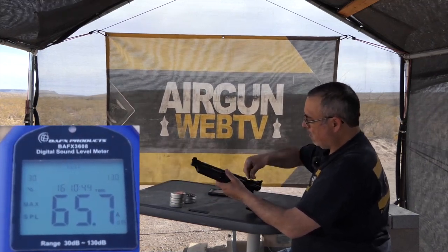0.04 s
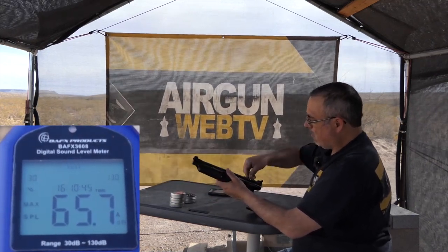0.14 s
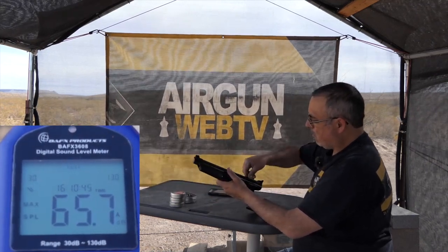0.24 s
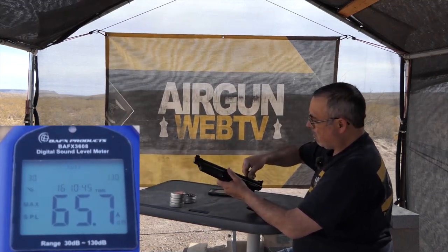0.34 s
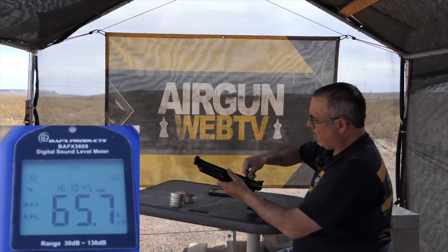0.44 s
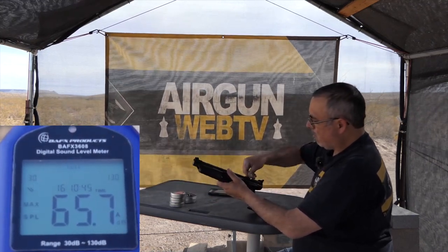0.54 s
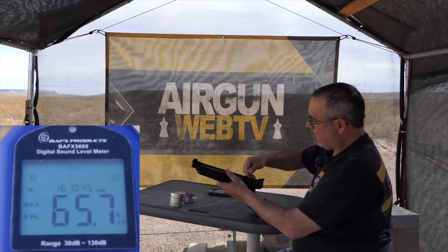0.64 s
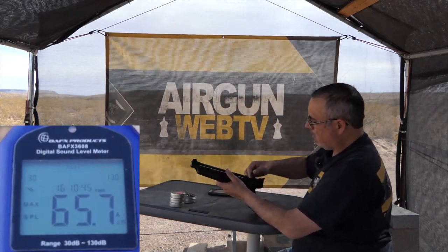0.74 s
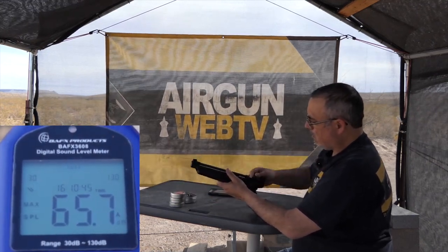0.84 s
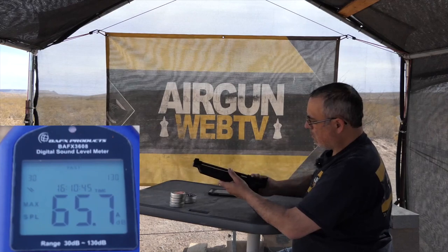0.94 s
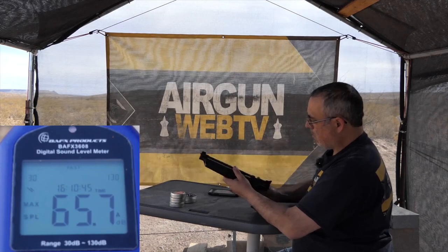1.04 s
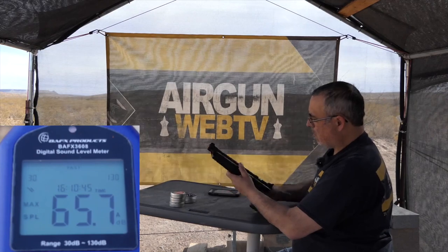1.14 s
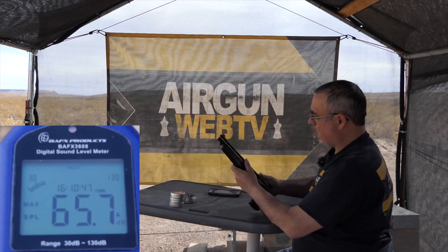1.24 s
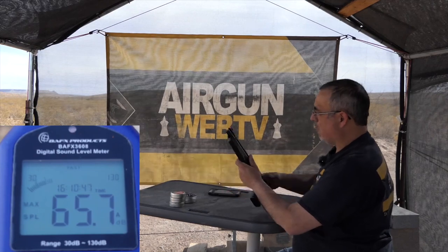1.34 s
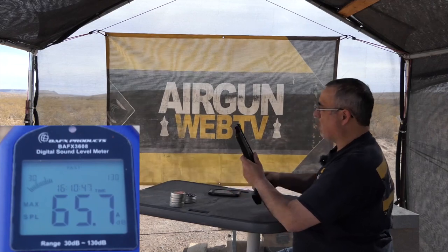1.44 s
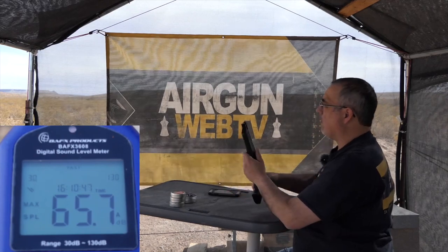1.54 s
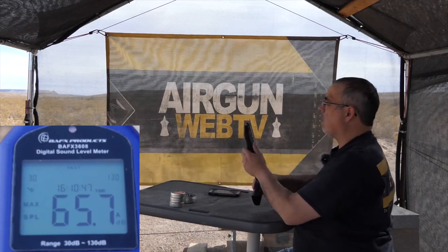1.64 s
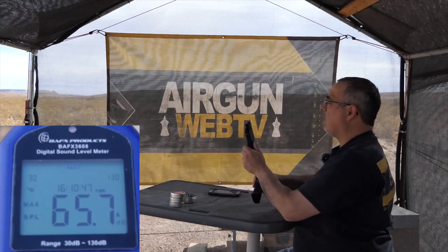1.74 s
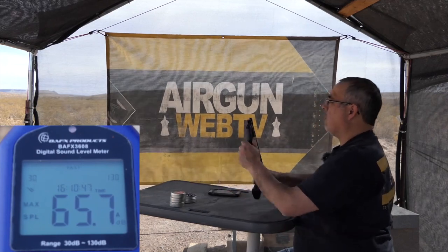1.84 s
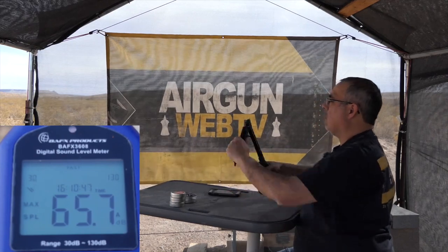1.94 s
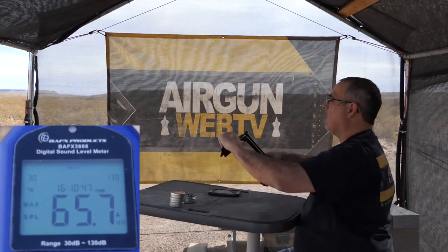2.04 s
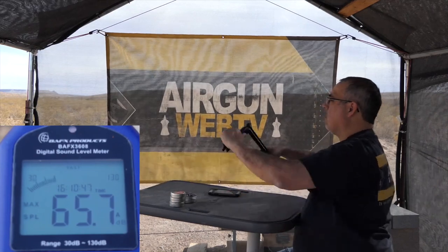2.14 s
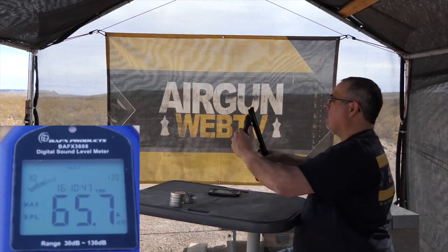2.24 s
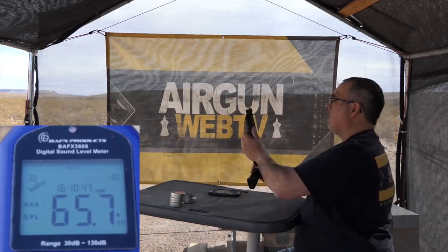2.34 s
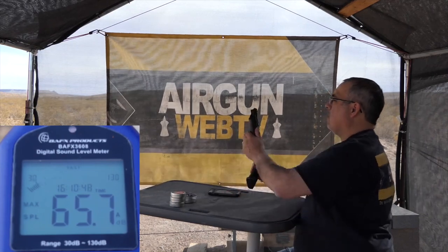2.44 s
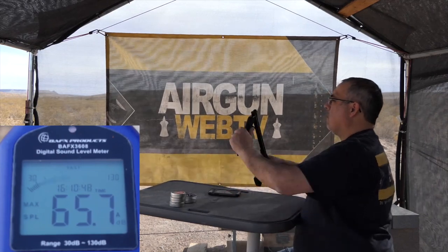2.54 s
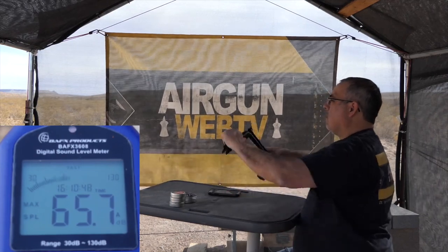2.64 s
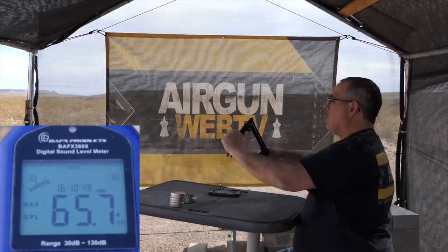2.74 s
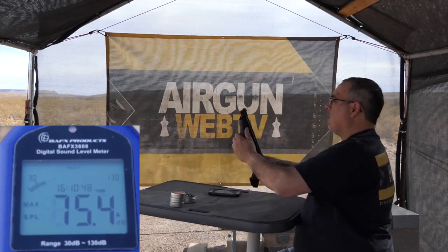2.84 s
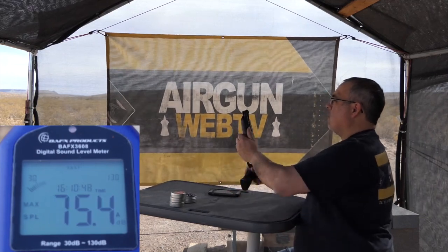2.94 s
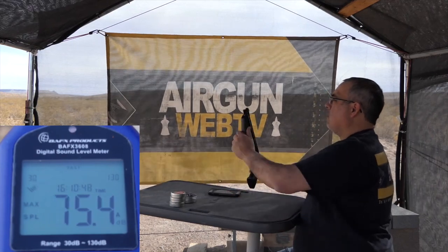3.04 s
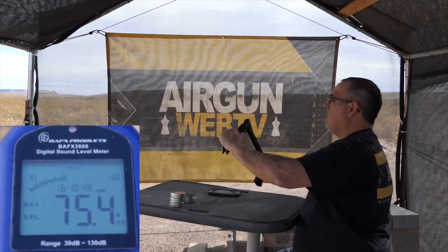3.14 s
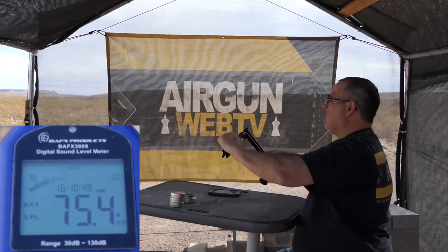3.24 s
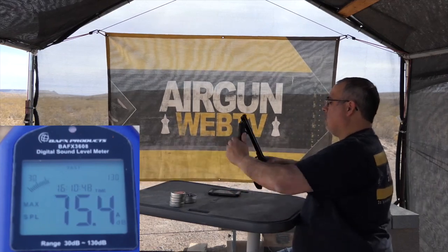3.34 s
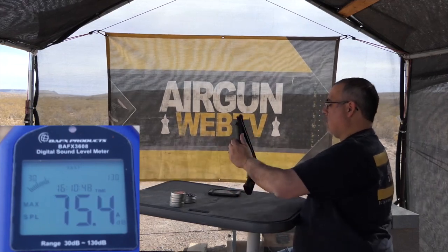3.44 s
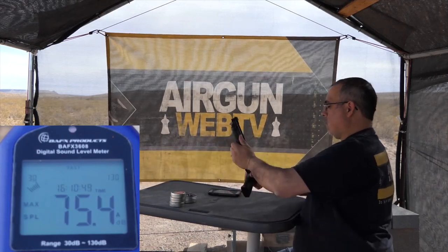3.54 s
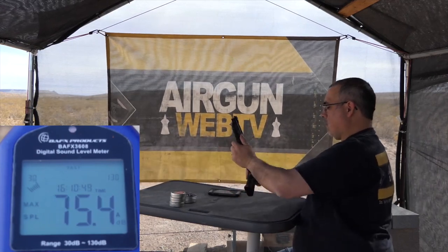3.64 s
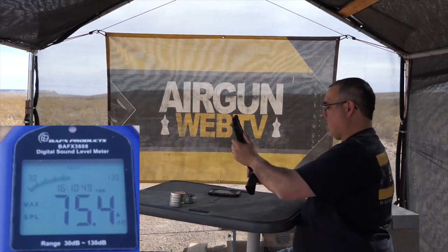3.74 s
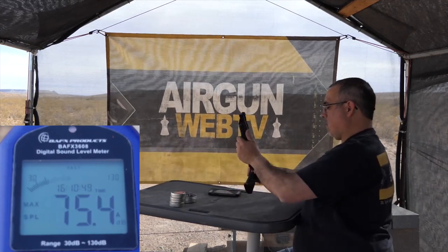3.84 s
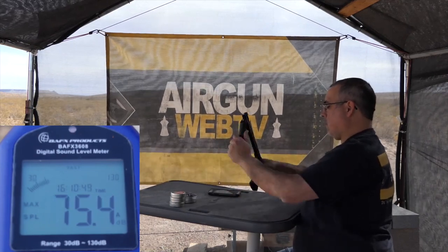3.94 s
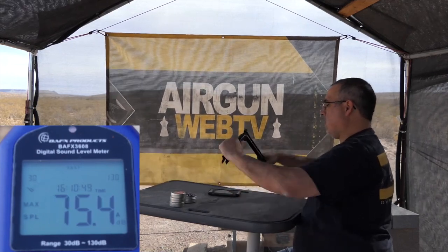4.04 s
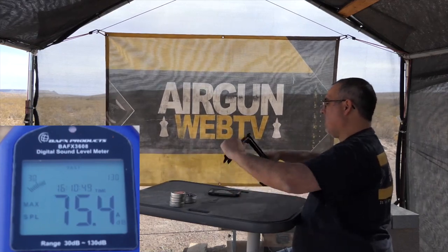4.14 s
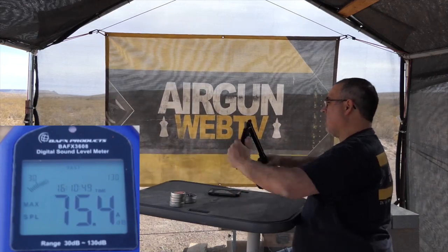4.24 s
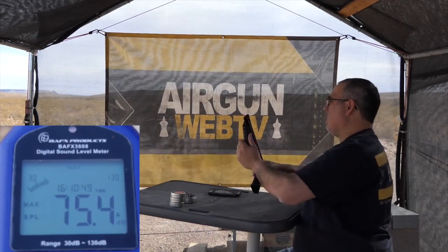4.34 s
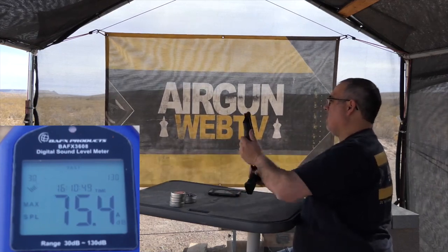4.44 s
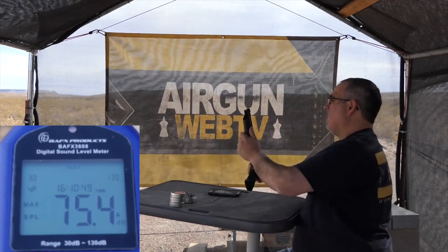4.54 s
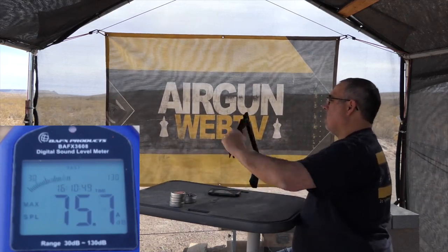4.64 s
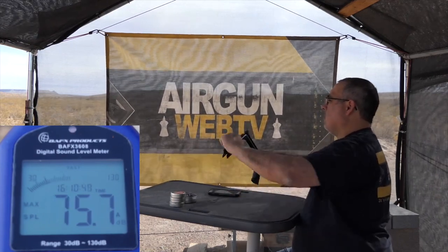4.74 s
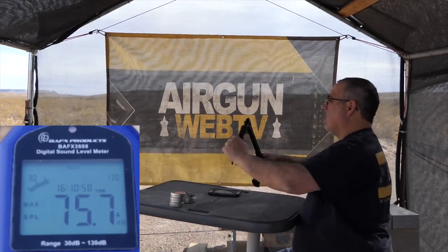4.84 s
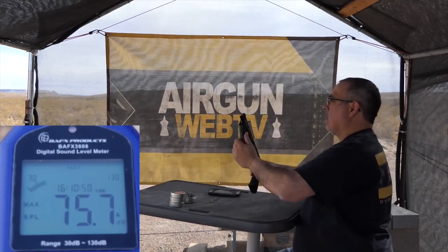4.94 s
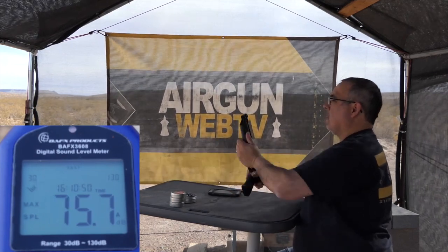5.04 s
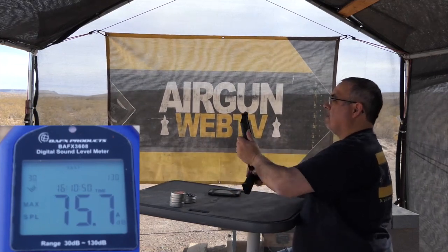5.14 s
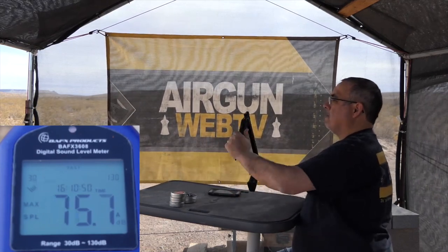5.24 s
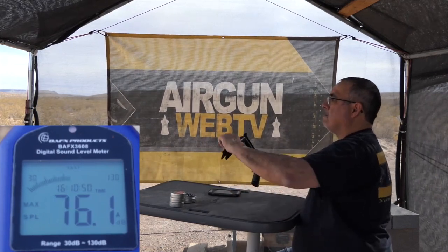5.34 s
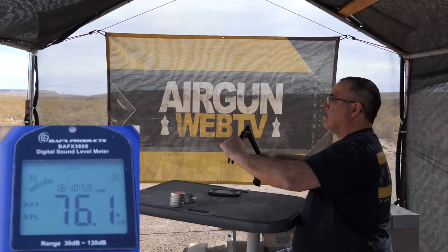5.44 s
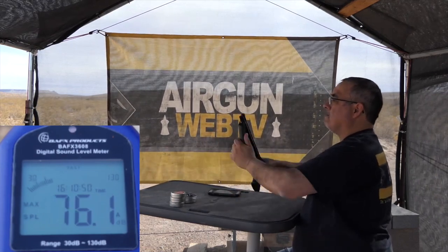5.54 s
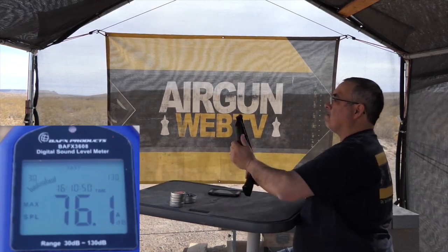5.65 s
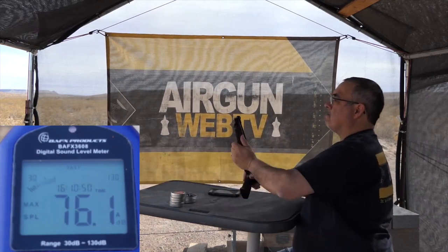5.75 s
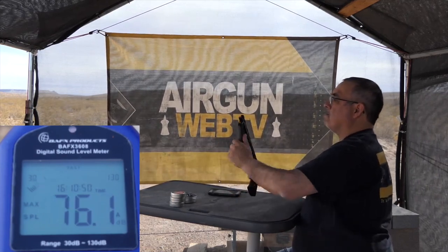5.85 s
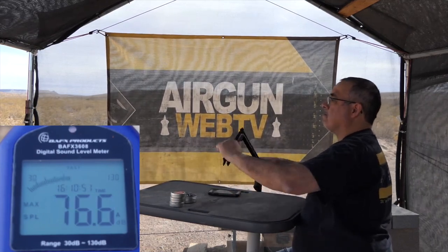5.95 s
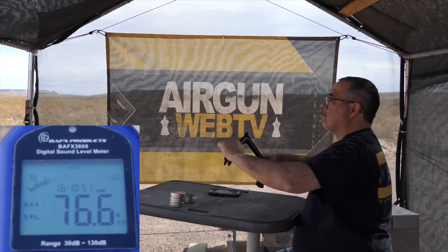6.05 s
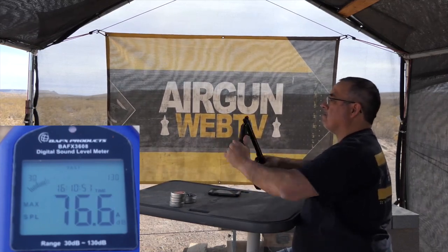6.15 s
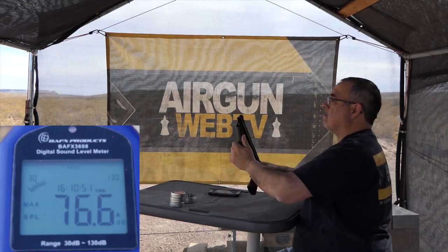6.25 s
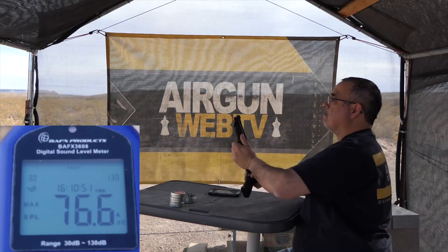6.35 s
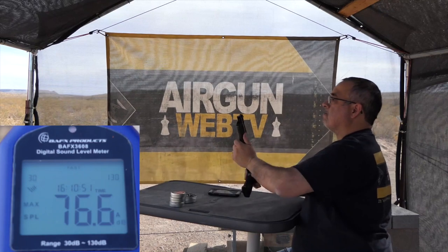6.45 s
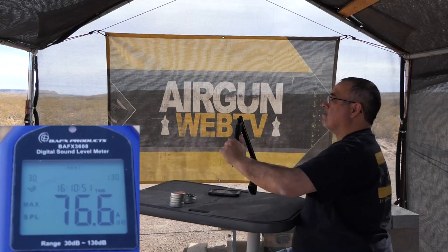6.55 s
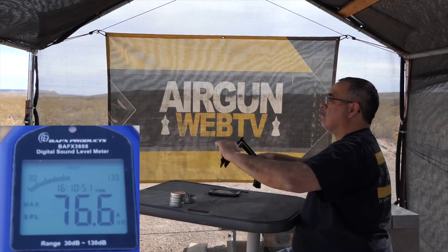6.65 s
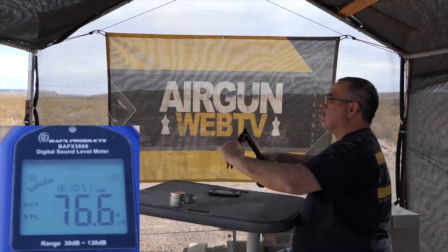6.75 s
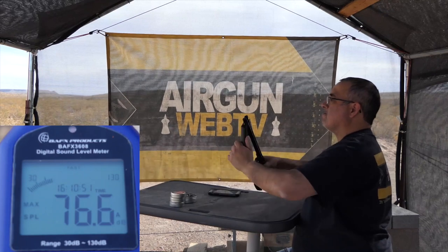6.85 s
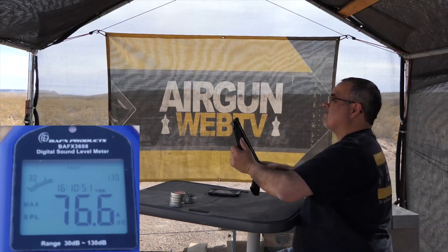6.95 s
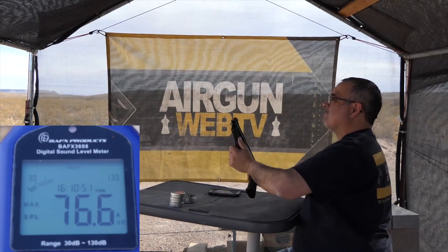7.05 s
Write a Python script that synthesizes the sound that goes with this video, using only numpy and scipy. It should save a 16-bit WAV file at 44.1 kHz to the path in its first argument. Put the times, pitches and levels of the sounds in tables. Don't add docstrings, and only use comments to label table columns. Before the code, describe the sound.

Close up outdoors, a pump air pistol's bolt drags and knocks shut, then its stiff lever is cracked open and pumped seven times with ringing slams.

```python
import sys
import numpy as np
from scipy import signal
from scipy.io import wavfile
from scipy.ndimage import uniform_filter1d

SR = 44100
rng = np.random.default_rng(int(sys.argv[2]) if len(sys.argv) > 2 else 0)


def wav_out(sig):
    wavfile.write(sys.argv[1], SR, np.round(np.clip(np.atleast_2d(sig).T, -1, 1) * 32767).astype(np.int16))


def undo_db(level):
    steps = np.asarray(level, float) / 20
    return 10 ** steps


N = 312669

# pitch_hz, level_db, t60_s
TUBE_MODES = [(1542, -6.5, 0.024), (1738, -3.5, 0.027), (1920, -0.47, 0.016), (2230, -3, 0.01)]
# pitch_hz, level_db, t60_s
LINK_MODES = [(2758, 3.5, 0.006), (3481, -2.5, 0.013), (3860, 0.5, 0.0045), (5450, -2, 0.0043)]
# pitch_hz, level_db, t60_s
EDGE_MODES = [(6226, -0.5, 0.0036), (7145, 2, 0.0036), (8100, 4, 0.003), (9000, 2.5, 0.0027),
              (10100, -1.5, 0.0015)]
# pitch_hz, under_blow_db, t60_s
FRAME_MODES = [(594, -18, 0.027), (1050, -6, 0.11)]
FRAME_DB = -10.5
# pitch_hz, level_db, t60_s
BOLT_SPRING_MODES = [(1640, -1, 0.023), (2840, -4.5, 0.043), (3780, -15, 0.044), (4400, -9, .02),
                     (776, -10, 0.052)]
# start_s, level_db, tick_lag_ms, tick_db
CATCHES = [
    (2.6453, -29.5, 28, -34),
    (3.2073, -28.5, 27, -34),
    (4.0805, -25.5, 30.1, -31.5),
    (4.743, -26.5, 24, -37),
    (5.3803, -25.5, 21, -35),
    (6.012, -27, 19, -35),
    (6.6786, -24.5, 19.0, -33),
]
# start_s, level_db, rebound_lag_ms, rebound_db, settling_lag_ms
STOPS = [
    (2.168, -25.5, 6.9, -29, 27.6),
    (2.7669, -30, 7.9, -34, 51.5),
    (3.3124, -28.5, 6.6, -26.5, 53.5),
    (4.2036, -22, 12.9, -31.5, 89),
    (4.851, -27.5, 3.9, -34, 57.7),
    (5.479, -18.5, 15.2, -41, 66.0),
    (6.1127, -28.5, 6.4, -32, 59.1),
    (6.7822, -21.5, 7.3, -29, 53),
]
# start_s, level_db
TOUCHES = [
    (2.418, -10.5),
    (2.9799, -11),
    (3.5806, -14),
    (4.4967, -13),
    (5.1407, -13.5),
    (5.764, -17),
    (6.433, -17),
]
# start_s, pressure_db, brightness_db
SLAMS = [
    (2.4737, -27, -1.5),
    (3.0404, -30.5, -1.5),
    (3.646, -28.5, -0.5),
    (4.5441, -23.5, 0.5),
    (5.1819, -24.5, 0.5),
    (5.8103, -24, -1.5),
    (6.471, -25, -1),
]


def rms_one(x):
    return x / np.sqrt(np.mean(x ** 2) + 1e-20)


def drift(rate):
    r = np.exp(-80 * np.pi * rate / SR)
    slow = signal.lfilter([1], [1, -2 * r, r * r], rng.standard_normal(N // 40 + 2002))[2000:]
    return np.interp(np.arange(N) / 40, np.arange(len(slow)), rms_one(slow))


def ring(force, hz, t60):
    r = undo_db(-60 / (t60 * SR))
    w = 2 * np.pi * hz / SR
    return signal.lfilter([0, np.sin(w)], [1, -2 * r * np.cos(w), r * r], force + 1e-18)


def add(out, times, sounds):
    for s, sound in zip(times, sounds):
        i = round(s * SR)
        out[i:i + len(sound)] += sound[:N - i]


def banded_noise(spectrum, patchy_db, rate):
    hz, level_db = np.transpose(spectrum)
    top_hz = min(hz[-1], .4 * SR)
    edges = np.geomspace(hz[0], top_hz, round(3 * np.log2(hz[-1] / hz[0])))
    white = rng.standard_normal((2, N))
    together = drift(rate)
    out = 0
    for k, (low, high) in enumerate(zip(edges, edges[1:])):
        sos = signal.butter(2, [low, high], "band", fs=SR, output="sos")
        band = signal.sosfilt(sos, white[k % 2])
        here_db = np.interp(np.log(low * high) / 2, np.log(hz), level_db)
        out = out + band * undo_db(here_db + patchy_db * (0.33 * together + drift(rate)))
    return rms_one(out)


def strike(times, levels_db, modes):
    blows = np.zeros(N)
    add(blows, times, undo_db(np.c_[levels_db]))
    return sum(undo_db(db) * ring(blows, hz, t60) for hz, db, t60 in modes)


def small_strike(s, modes):
    return signal.sosfilt(signal.butter(2, 480, "high", fs=SR, output="sos"), strike([s], [0], modes))


def contacts(times, length_ms, levels_db, damping, rattle_db, rise, lean_db=0, timed_by=slice(0, 4),
             edge_lean_db=0):
    # pitch_hz, level_db, t60_s
    grip_modes = [(536, -5, 0.049), (817, 6, 0.012), (1190, -1, 0.016)]
    ms = np.arange(2600) / SR * 1000 - 8
    grit = rng.standard_normal((len(times), 4, len(ms)))
    uneven_db = rng.normal(0, 3.7, (len(times), 4, 5))
    uneven_db[:, 1] += np.c_[lean_db + 0 * times] * (np.arange(5) - 1.5)
    uneven_db[:, 3] += np.c_[edge_lean_db + 0 * times] * (np.arange(5) - 2)
    width_ms = np.maximum(0.57 * np.c_[length_ms] - .4, .15) * np.where(ms < 0, rise, 1.4)
    rattle = undo_db(rattle_db) * np.exp(-ms / 6 - (ms / 25) ** 4) * (ms > 0)
    pressure = np.exp(-(ms / width_ms) ** 2) + rattle
    parts = []
    for k, part in enumerate([grip_modes, TUBE_MODES, LINK_MODES, EDGE_MODES]):
        edges_hz = [0.66 * part[0][0], 1.6 * part[-1][0]]
        sos = signal.butter(2, edges_hz, "band", fs=SR, output="sos")
        force = signal.sosfilt(sos, pressure * grit[:, k])
        sound = 0
        for m, (hz, db, t60) in enumerate(part):
            sound = sound + (-1) ** m * undo_db(db + uneven_db[:, k, m:m + 1]) * ring(force, hz, t60 / damping)
        top = np.sqrt(uniform_filter1d(sound ** 2, size=60).max(axis=1, keepdims=True))
        parts.append(sound / top * undo_db(np.c_[levels_db[k]]))
    peak = uniform_filter1d(sum(parts[timed_by]) ** 2, size=50).argmax(axis=1)
    out = np.zeros(N)
    add(out, times - peak / SR, sum(parts))
    return out


def contact_rows(colour, s, db, bright_db=0, length_ms=None):
    bright_share = (-0.6, 0.36, 0.96, 1.6)
    levels_db = np.c_[db] + colour[1:] + np.c_[bright_db + 0 * s] * bright_share
    return np.c_[s, colour[0] + 0 * s if length_ms is None else length_ms, levels_db]


def abrupt_contacts(rows, lean_db):
    s, length_ms, *levels_db = rows.T
    return contacts(s, length_ms, levels_db, damping=1.3, rattle_db=-4.5, rise=0.36, lean_db=lean_db)


def light_contacts(rows):
    s, body_db, edge_db = np.transpose(rows)
    levels_db = [body_db - 11.5, body_db - 5.5, edge_db + 0.0, edge_db - 5.0]
    return contacts(s, 0 * s + 3.9, levels_db, damping=3.4, rattle_db=-3.0, rise=0.085, lean_db=-0.3)


def slips():
    return rng.standard_normal((2, N)) * undo_db(4 * drift(150))


def slip_ring(force, modes):
    return rms_one(sum(ring(force, hz, t60) * undo_db(db) for hz, db, t60 in modes))


def swells(rows, t60):
    t = np.arange(N) / SR
    white = rng.standard_normal(N) * undo_db(2.0 * drift(40))
    out = 0
    for s, length, hz, db in rows:
        out = out + undo_db(db) * np.exp(-((t - s) / length) ** 2) * rms_one(ring(white, hz, t60))
    return out


def rattles(rows, modes):
    s, db = np.transpose(rows)
    out = 0
    for m, mode in enumerate(modes):
        out = out + (-1) ** m * strike(s, db + rng.normal(0, 4, len(s)), [mode])
    return out


def wind():
    # frequency_hz, density_db_per_hz
    wind_spectrum = [(8.8, -15), (15, 12), (46, -4), (97, -25.5), (162, -16), (296, -53.5), (400, -63),
                     (520, -74), (880, -120)]
    return undo_db(-44) * banded_noise(wind_spectrum, patchy_db=1.5, rate=5)


def arm_pause(hard, depth_db, hold_s, back_s):
    since = np.arange(N) / SR - np.c_[hard]
    return -depth_db * np.max((since > .01) * np.clip(1 - (since - hold_s) / back_s, 0, 1), axis=0)


def slide():
    # start_s, level_db
    arm_speed = [(0, -61), (0.25, -55.5), (0.5, -58.5), (0.85, -60.5), (1.36, -63.5), (1.55, -57),
                 (1.91, -54), (3.54, -54), (3.749, -59), (3.949, -62.5), (4.17, -53.5), (4.401, -54.5),
                 (5.0, -56.5), (5.229, -57), (5.62, -57), (5.82, -53), (6.281, -57.5), (7.09, -56.5)]
    # frequency_hz, density_db_per_hz
    rustle_spectrum = [(150, -26.5), (250, -8), (342, -16), (551, 9), (1210, 7.5), (1540, 6.5), (2540, 9.5),
                       (5000, -24), (6500, -53), (11000, -120)]
    # frequency_hz, density_db_per_hz
    hiss_spectrum = [(1760, -28.5), (3000, -8.5), (3680, -8.5), (4080, -9.5), (11700, -12), (15300, -53.5),
                     (22000, -120)]
    arm_db = np.interp(np.arange(N) / SR, *np.transpose(arm_speed))
    pause_db = arm_pause(np.array(SLAMS)[:, 0], depth_db=7.0, hold_s=0.11, back_s=0.07)
    pause_db += arm_pause(np.array(STOPS)[:, 0], depth_db=6, hold_s=.03, back_s=.08)
    rustle = undo_db(arm_db + 0.77 * pause_db) * banded_noise(rustle_spectrum, patchy_db=1.0, rate=22)
    hiss = undo_db(arm_db - 1.5 + pause_db) * banded_noise(hiss_spectrum, patchy_db=-1.55, rate=10.0)
    return undo_db(3 * drift(120) - 2.5) * (rustle + hiss)


def seal_squeaks():
    # middle_s, length_s, pitch_hz, level_db
    squeaks = [
        (0.25, 0.14, 2320, -60.5),
        (1.55, 0.08, 2100, -57),
        (2.1, 0.063, 2400, -68),
        (3.45, 0.29, 2326, -70),
        (4.17, 0.064, 2530, -61),
        (4.42, 0.063, 3430, -58.5),
        (5.07, 0.026, 3400, -58.5),
        (5.72, 0.052, 2100, -68),
        (6.32, 0.017, 3400, -48.5),
        (7.0, 0.053, 3350, -58),
    ]
    return swells(squeaks, t60=0.007)


def puffs():
    # middle_s, length_s, pitch_hz, level_db
    seal_puffs = [
        (0.27, 0.16, 6460, -61),
        (1.54, 0.065, 6900, -56),
        (2.33, 0.025, 7400, -53.5),
        (3.52, 0.076, 6760, -54),
        (4.36, 0.045, 8100, -53),
        (4.98, 0.052, 6750, -60),
        (5.6, 0.043, 7330, -64),
        (6.26, 0.054, 7140, -58),
        (6.95, 0.11, 7250, -60),
    ]
    return swells(seal_puffs, t60=0.0009)


def loading():
    # start_s, contact_length_ms, level_db, brightness_db
    hand = [(0.5335, 3.2, -43, -21.5), (1.0186, 2.2, -35, 0.5), (1.1215, 2.7, -20, 3),
            (1.2108, 2.9, -21, -5.5), (1.2298, 3.7, -37.5, -4.5), (1.24, 8.3, -54, -27.5),
            (1.2539, 47, -47, -17), (1.2846, 14, -48, -16), (1.295, 2.69, -43.5, -13.5),
            (1.315, 17, -68, -22), (1.1175, 3.5, -27, 4.5), (1.262, 9, -61, -24), (1.7545, 2.3, -48, -6)]
    # start_s, contact_length_ms, level_db, brightness_db
    opening = [
        (1.9527, 1.8, -38, 0),
        (1.9613, 7.6, -29.5, -1.5),
        (1.9674, 9.5, -30, 17.5),
        (1.9794, 1.5, -22, 4.5),
        (1.9869, 10, -29, 2.5),
        (2.0022, 2.2, -28, -0.5),
        (2.277, 3.8, -38, 7),
    ]
    lean_db = (0, -0.5, 0, 2, 8, 1, 9, 2, 1, -.5, -12, 1.5, 5, -8, 1, -1.5, 9, -0.5, 2, -7)
    # length_ms, grip_db, tube_db, link_db, edge_db
    plain = (5, -8.5, 1, -3.5, -10.5)
    # pitch_hz, peak_db, t60_s
    handle = [(1710, -32.5, 0.047), (2870, -27, 0.029), (610, -43, 0.063), (3400, -30.5, 0.011),
              (4370, -37.5, 0.0049)]
    # pitch_hz, peak_db, t60_s
    bolt = [(1280, -55.5, 1), (1630, -59, .09), (1990, -47, .12), (2520, -54, 0.17), (3180, -55, .15),
            (3730, -13.5, 0.016), (4200, -17.5, 0.013), (3950, -55, 0.086), (2320, -52, .02),
            (1690, -40, 0.075)]
    # pitch_hz, peak_db, t60_s
    stock = [(790, -22, 0.05), (700, -50, 0.062), (840, -46, 0.13), (934, -28, 0.063), (1277, -59, 0.46),
             (1350, -12.5, 0.016), (2090, -12.5, 0.018), (4100, -29, 0.014), (5300, -43.5, .012)]
    # pitch_hz, peak_db, t60_s
    grasp = [(1210, -27.5, 0.017), (895, -34, 0.012), (2800, -36.5, .012), (4000, -44, 0.0031)]
    # pitch_hz, peak_db, t60_s
    freeing = [(1060, -28, 0.011), (1900, -29.5, 0.013), (4660, -34, .015), (7500, -31, 0.0063)]
    s, length_ms, db, bright_db = np.transpose(list(hand) + list(opening))
    out = abrupt_contacts(contact_rows(plain, s, db, bright_db, length_ms), lean_db)
    out += strike([1.121], [0], bolt) - strike([1.2122], [0], stock)
    out += small_strike(1.0168, handle)
    return out - small_strike(1.7525, grasp) - small_strike(1.9497, freeing)


def jolts(rows, sign, push_hz, push_t60):
    s, push_db, swing_db = np.transpose(rows)
    push, swing = np.zeros((2, N))
    add(push, s, undo_db(np.c_[push_db]))
    add(swing, s + .007, undo_db(np.c_[swing_db]))
    soft = signal.butter(2, 420, fs=SR, output="sos")
    return sign * signal.sosfilt(soft, 1.5 * ring(push, push_hz, push_t60) - ring(swing, 40, .09))


def body_jolts():
    # start_s, push_peak_db, slow_swing_db
    loading_jolts = [
        (0.532, -27.5, -41),
        (1.21, -24, -17),
        (1.29, -35, -31),
    ]
    opened = list(loading_jolts) + [(s - .0025, -27.5, -25.5) for s, *_ in STOPS]
    shut = [(s - .0035, -37.5, -33) for s, *_ in SLAMS]
    out = jolts(opened, 0.85, push_hz=127, push_t60=0.044)
    return out + jolts(shut, -1.1, push_hz=185.0, push_t60=0.055)


def ticks():
    # start_s, body_db, edge_db
    stray = [(0.5651, -38, -54.5), (0.572, -46, -43.5), (0.603, -44, -50), (1.099, -36, -43.5),
             (1.135, -30, -61.5), (1.7912, -36, -47), (2.0695, -43.5, -46), (2.3055, -47, -42),
             (2.6354, -42, -29.5), (3.2022, -31, -57), (3.9422, -43.5, -44), (4.01, -37, -47.5),
             (4.0483, -25, -33), (4.228, -33, -47.5), (4.236, -53.5, -39), (4.251, -44, -38),
             (4.3516, -34, -51.5), (5.324, -37, -52.5), (5.4969, -36, -58), (5.677, -40.5, -48),
             (6.4103, -41, -44.5), (6.623, -32, -57), (6.763, -57, -40.5), (6.8022, -52, -56.5),
             (6.845, -41, -42), (6.8981, -36.5, -49), (7.011, -42, -42.5), (3.852, -54.5, -59),
             (3.933, -47, -57.5), (3.977, -43, -52.5)]
    # start_s, body_db, edge_db
    faint = [(0.558, -43.5, -56.5), (0.619, -50, -54), (0.88, -61, -68.5), (1.006, -55, -53),
             (1.072, -55, -46), (1.082, -50, -48.5), (1.091, -44, -36.5), (1.097, -46, -38),
             (2.149, -36, -54), (2.33, -43.5, -47.5), (2.552, -67, -57), (2.877, -53, -48.5),
             (3.384, -57, -49.5), (3.565, -46.5, -44), (4.656, -52, -54.5), (4.797, -49.5, -50.5),
             (4.9, -52, -49.5), (4.959, -57, -55.5), (5.296, -51.5, -57), (5.462, -55.5, -39.5),
             (5.535, -64, -43.5), (6.086, -65, -52), (6.162, -62, -52.5), (6.228, -51, -50.5)]
    slack_db = (-39, -32.5, -34.5, -44, -36, -42, -30, -33.5)
    # body_db, edge_db
    settling = [(-36, -45), (-38, -38.5), (-40, -41.5), (-38, -38.5), (-38, -41), (-37.5, -44.5),
                (-33.5, -39.5), (-37.5, -42)]
    follow = [(s + ms / 1000, db, db - 9.5) for s, _, ms, db in CATCHES]
    lead = [(s - 0.0125, db, db - 8.5) for (s, *_), db in zip(STOPS, slack_db)]
    settle = [(s + ms / 1000, db, edge_db) for (s, *_, ms), (db, edge_db) in zip(STOPS, settling)]
    return light_contacts(follow + lead + settle + list(stray)) + light_contacts(faint)


def bolt_drag():
    # start_s, end_s
    drag_s = (1.035, 1.127)
    # start_db, end_db
    drag_db = (-56.5, -43)
    # start_s, level_db
    steps = [
        (1.070, -52),
        (1.079, -41),
        (1.090, -39),
        (1.097, -40),
        (1.108, -41),
    ]
    t = np.arange(N) / SR
    low, high = slips()
    spring = slip_ring(low, BOLT_SPRING_MODES)
    bright = slip_ring(high, list(LINK_MODES) + list(EDGE_MODES))
    dragging = (t > drag_s[0]) * (t < drag_s[1]) * undo_db(np.interp(t, drag_s, drag_db))
    return dragging * (spring + undo_db(0.5) * bright) + rattles(steps, BOLT_SPRING_MODES)


def stock_rattle():
    # start_s, level_db
    small_knocks = [
        (1.2115, -18),
        (1.227, -27.5),
        (1.238, -34.5),
        (1.248, -37),
        (1.256, -38),
        (1.281, -40),
        (1.287, -43),
        (1.294, -37.5),
        (1.306, -39),
        (1.317, -50),
    ]
    # pitch_hz, level_db, t60_s
    hollow = [(190, -2.5, 0.019), (119, 1.5, 0.058), (553, -13, 0.03), (683, -3.5, 0.037), (802, -2, 0.027),
              (1260, -6, 0.015)]
    return rattles(small_knocks, hollow)


def stopping():
    # length_ms, grip_db, tube_db, link_db, edge_db
    stop_colour = (2.5, -8, 1, 2, -3)
    # length_ms, grip_db, tube_db, link_db, edge_db
    rebound_colour = (8, -3, -7.5, -1, -0.5)
    lean_db = (-5.5, -5, -7.5, 1.5, -9, -7, 0, 2.5)
    s, db, lag_ms, rebound_db, _ = np.transpose(STOPS)
    hits = contact_rows(stop_colour, s, db)
    rebounds = contact_rows(rebound_colour, s + lag_ms / 1000, rebound_db)
    out = abrupt_contacts(np.vstack([hits, rebounds]), np.r_[lean_db, lean_db])
    return out + strike(s, db + FRAME_DB, FRAME_MODES)


def creak():
    # middle_s, half_length_s, level_db
    moves = [(2.37, 0.12, -57.5), (2.706, .05, -62), (2.943, .07, -61), (3.259, 0.055, -62.5),
             (3.529, 0.07, -55.5), (4.148, 0.061, -60.5), (4.412, 0.071, -53.5), (4.797, 0.064, -63),
             (5.043, 0.036, -57.5), (5.42, 0.11, -59), (5.7, 0.069, -58.5), (6.058, 0.089, -66),
             (6.29, 0.078, -61.5), (6.716, 0.104, -60.5), (6.97, 0.17, -64.5)]
    # pitch_hz, level_db, t60_s
    singing = [(1560, -4.5, 0.092), (1925, -6.5, .05), (2540, -4, 0.076), (2920, -9.5, 0.044),
               (3770, -3, 0.03)]
    t = np.arange(N) / SR
    moving = sum(undo_db(db) * np.exp(-((t - s) / length) ** 4) for s, length, db in moves)
    white = rng.standard_normal(N)
    song = sum(undo_db(db - 3 + 5.3 * drift(25)) * rms_one(ring(white, hz, t60)) for hz, db, t60 in singing)
    return moving * song


def turning():
    # start_s, level_db, brightness_db
    turns = [
        (2.3967, -30.5, 6.5),
        (2.9483, -26, 3),
        (3.4983, -24.5, 3),
        (4.423, -26, -0.5),
        (5.0352, -36.5, 3.5),
        (5.6649, -34.5, 7),
        (6.307, -32.5, 3.5),
        (6.99, -34, 10.5),
    ]
    # length_ms, grip_db, tube_db, link_db, edge_db
    turn_colour = (2.2, -16, -1, -12.5, -29)
    lean_db = (1, -3.5, -4.5, -1, 1, 2.1, 1, 6.5)
    return abrupt_contacts(contact_rows(turn_colour, *np.transpose(turns)), lean_db)


def closing():
    # start_s, steel_db, tube_over_swell_db
    bounce_table = [(2.43, -25, 2), (2.4353, -17.5, -4.5), (2.4431, -18.5, -4.5), (2.451, -14.5, -5),
                    (2.454, -20.5, -0.5), (2.4602, -15, -2), (2.9907, -20, 5), (2.9988, -17.5, 1),
                    (3.0073, -20.5, 0), (3.0124, -22.5, 6.5), (3.0184, -17.5, -2.5), (3.026, -23, -4.5),
                    (3.0301, -19, -4.5), (3.6, -15.5, 1.5), (3.612, -21, 5), (3.6191, -17.5, 2),
                    (3.6246, -17, 0.5), (3.6318, -18, 1), (3.6338, -27, 7.5), (4.5095, -17, -3.5),
                    (4.5183, -17.5, -0.5), (4.5234, -26.5, -5.5), (4.5263, -17, -2), (4.531, -18, -4.5),
                    (4.5364, -21, 6), (5.154, -26.5, 1.5), (5.1588, -25, -1), (5.1645, -18, -2),
                    (5.1686, -27, 2.5), (5.171, -19.5, -5.5), (5.1745, -22, -1.5), (5.7778, -27, 2),
                    (5.7841, -20, -10.5), (5.792, -22, -0.5), (5.7953, -22, -2.5), (5.8001, -23, -16),
                    (5.802, -15.5, 5.5), (6.4445, -19, 0.5), (6.4524, -20, 1.5), (6.4579, -22, -5.5),
                    (6.4617, -14.5, 2), (6.464, -20, 4)]
    # lead_ms, level_db
    seats = [(1.8, -17), (2.1, -21), (3.7, -12.5), (3.6, -15.5), (2.9, -18.5), (3, -25.5), (2.4, -21)]
    # length_ms, grip_db, tube_db, link_db, edge_db
    touch_colour = (5, -22, -12, -11, -1)
    bounce_colour = (4.5, -22, -13.5, -5, -0.5)
    seat_colour = (1.5, -11, -7.5, -4, -5)
    slam_colour = (4, -12.5, 1, -3.5, -1.5)
    slam_lean = (1.5, 3.2, 2.5, 5, 8, 8.1, 4.7)
    slam_tube = (-1.7, -2.5, -0.7, -2, -0.83, 1, -1.2)
    slam_link = (2.5, 4.8, 1.8, 2.2, 1.7, 1.8, 2.5)
    touch_edge_lean = (3, 3, 3, 2.3, 2.1, 1.6, 3.1)
    first, touch_db = np.transpose(TOUCHES)
    slam, pressure_db, bright_db = np.transpose(SLAMS)
    times, bounce_db, tube_db = np.transpose(bounce_table)
    stroke = np.searchsorted(slam, times)
    closed = (times - first[stroke]) / (slam - first)[stroke]
    touches = contact_rows(touch_colour, first, touch_db, length_ms=2.4 + 0 * first)
    touches[:, 3] = 3 + pressure_db
    bounces = contact_rows(bounce_colour, times, bounce_db, length_ms=2.4 + 0 * times)
    bounces[:, 3] = -3 + tube_db + pressure_db[stroke] + 11 * closed
    lead_ms, seat_db = np.transpose(seats)
    seatings = contact_rows(seat_colour, slam - lead_ms / 1000, seat_db)
    slammings = contact_rows(slam_colour, slam, -7.5 + 0 * slam, bright_db)
    slammings[:, 3] += slam_tube
    slammings[:, 4] += slam_link
    s, length_ms, *levels_db = np.vstack([touches, bounces, seatings, slammings]).T
    lean_db = np.r_[np.full(len(s) - len(slam), -3.0), slam_lean]
    edge_lean_db = np.r_[touch_edge_lean, 1.5 + 0 * times, 0 * slam, 0 * slam]
    return contacts(s, length_ms, levels_db, damping=1.4, rattle_db=-12.5, rise=.42, lean_db=lean_db,
                    timed_by=slice(2, 4), edge_lean_db=edge_lean_db)


def lever_drags():
    tightening = (-10.5, -16, -9.5, -3, 3, 3, -3)
    t = np.arange(N) / SR
    low, high = slips()
    tube = slip_ring(low, TUBE_MODES[:2])
    tight = slip_ring(high, TUBE_MODES[2:])
    bright = slip_ring(high, list(LINK_MODES) + list(EDGE_MODES))
    out = np.zeros(N)
    for (first, _), (slam, db, _), tight_db in zip(TOUCHES, SLAMS, tightening):
        start, end = first + 0.0078, slam + 0.0039
        pressing = uniform_filter1d(1. * (t > start) * (t < end), size=130)
        press_db = 0.5 + np.interp(t, [start, end], [db - 22, db])
        tight_gain = undo_db(np.interp(t, [start, end], [tight_db - 12.5, tight_db]))
        out += pressing * undo_db(press_db) * (tube + tight_gain * tight + undo_db(-13) * bright)
        chatter = uniform_filter1d(1. * (t > start) * (t < end - 0.0045), size=130)
        out += chatter * undo_db(np.interp(t, [start, end], [db - 11, db - 5.5])) * bright
    return out


def stilled():
    delay_ms, speed_ms, depth_db = 2.7, 2.3, -1.5
    since_ms = (np.arange(N) / SR - np.array(SLAMS)[:, :1]) * 1000 - delay_ms
    fading = np.maximum(np.exp(-np.maximum(since_ms, 0) / speed_ms), undo_db(depth_db))
    return np.where(since_ms < 90, fading, 1).min(axis=0)


def gripped(x):
    tube = signal.sosfiltfilt(signal.butter(2, [1200, 2700], "band", fs=SR, output="sos"), x)
    gain = stilled()
    return gain * (x - tube) + gain ** 2.5 * tube


def barrel():
    # pitch_hz, under_blow_db, t60_s
    steel = [(1660, -36, .13), (1895, -42, .9), (3012, -47, .3), (3758, -52, .7), (4190, -47, .4)]
    freedom = [
        (2.5, -7.5, 13.5, -12, 5),
        (13.5, -10.5, 24.5, -7.5, 5.5),
        (5, 10, 16.5, 8.5, 1),
        (-6.5, -3, 10.5, -2.5, -11),
        (1, 0.5, -1, 10.5, 1.5),
        (5, 3, -4, -4, -4),
        (-6.5, 7, 13, -6, 16),
    ]
    slam = np.array(SLAMS)[:, 0]
    out = 0
    for mode, free_db in zip(steel, np.transpose(freedom)):
        out = out + undo_db(5 * drift(30)) * strike(slam, free_db - 28, [mode])
    return out


def pops():
    # start_s, level_db
    pop_table = [
        (2.594, -37),
        (3.155, -39.5),
        (4.009, -37.5),
        (4.678, -41.5),
        (5.317, -39.5),
        (5.953, -34.5),
        (6.616, -42),
    ]
    s, level_db = np.transpose(pop_table)
    t = np.arange(600) / SR
    pitch_hz = 1000 + 1300 * np.minimum(t / 0.019, 1)
    wobble = 1 + 1.6 * uniform_filter1d(rng.standard_normal((len(s), len(t))), size=16)
    tone = np.hanning(len(t)) * np.sin(2 * np.pi * np.cumsum(pitch_hz) / SR)
    out = np.zeros(N)
    add(out, s, undo_db(np.c_[level_db]) * wobble * tone)
    return out


def unlatching():
    # start_s, level_db, scrape_db
    unlatches = [
        (2.603, -32.5, -30.5),
        (3.1685, -31, -39),
        (4.0245, -21, -24.5),
        (4.691, -32.5, -31),
        (5.33, -28.5, -38.5),
        (5.9637, -29, -42),
        (6.6311, -26.5, -37),
    ]
    # length_ms, grip_db, tube_db, link_db, edge_db
    unlatch_colour = (5.5, -15, 0.5, -11, -16.5)
    # length_ms, grip_db, tube_db, link_db, edge_db
    scrape_colour = (9, -12, -5, -6, -4.5)
    lean_db = (0, 2, 7, 4.5, 5.5, 2, 3)
    # pitch_hz, peak_db, t60_s
    grip_knock = [(555, -31, 0.088), (1010, -45, .02)]
    s, db, scrape_db = np.transpose(unlatches)
    scrape_s = s + 0.011
    rows = [contact_rows(unlatch_colour, s, db), contact_rows(scrape_colour, scrape_s, scrape_db)]
    out = abrupt_contacts(np.vstack(rows), np.r_[lean_db, lean_db])
    return out + strike(scrape_s, scrape_db + FRAME_DB, FRAME_MODES) + small_strike(4.043, grip_knock)


def catching():
    # length_ms, grip_db, tube_db, link_db, edge_db
    catch_colour = (4, -12.5, -1.5, -1, 0.5)
    lean_db = (-3.5, -1, 0, 7, 4, -1, -1)
    # pitch_hz, under_blow_db, t60_s
    catch_spring = [(6400, -6, 0.016), (6480, -28, .09)]
    s, db, *_ = np.transpose(CATCHES)
    return abrupt_contacts(contact_rows(catch_colour, s, db), lean_db) + strike(s, db, catch_spring)


def scene():
    background = wind() + slide() + seal_squeaks() + puffs() + creak()
    hands = loading() + bolt_drag() + stock_rattle() + body_jolts() + ticks()
    opening = pops() + unlatching() + catching() + stopping()
    shutting = turning() + gripped(closing()) + gripped(lever_drags()) + barrel()
    return np.tile(background + hands + opening + shutting, (2, 1))


def side_patches(x, threshold):
    edges_hz = [40, 300, 1000, 2500, 4500, 8000, 12000]
    blocks = np.arange(N) // 1024 * 1024
    together = drift(5.5)
    out = 0
    for low, high in zip(edges_hz, edges_hz[1:]):
        band = signal.butter(4, [low, high], "band", fs=SR, output="sos")
        apart = uniform_filter1d(1. * ((together + .7 * drift(8.0))[blocks] > threshold), size=200)
        flutter = signal.lfilter([.2], [1, -.98 if low < 1000 else -.8], rng.standard_normal(N))
        out = out + apart * signal.sosfilt(band, signal.sosfilt(band, x) * rms_one(flutter))
    return out


def band_limit(x):
    return signal.sosfilt(signal.butter(12, 11890, fs=SR, output="sos"), x)


def record(dry):
    x = signal.sosfilt(signal.cheby2(12, 50, 12530, fs=SR, output="sos"), dry)
    x = x + undo_db(-21.5) * side_patches(x[0], threshold=.1) * [[1], [-1]]
    return band_limit(np.clip(x, -1, 1))


dry = scene()
out = record(dry)
wav_out(out)
```